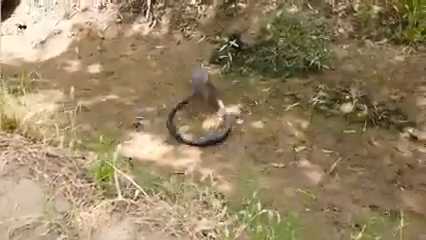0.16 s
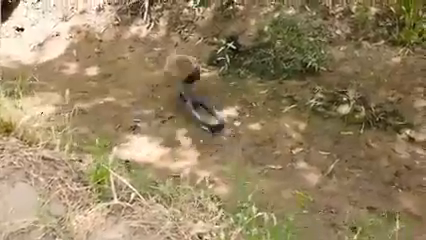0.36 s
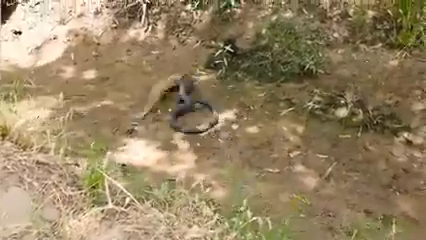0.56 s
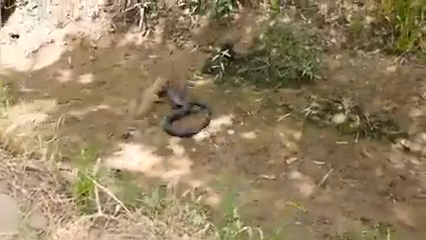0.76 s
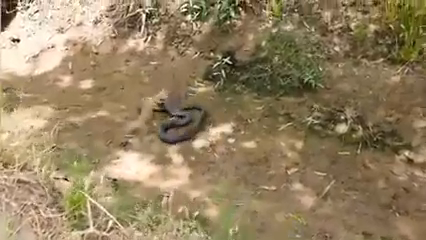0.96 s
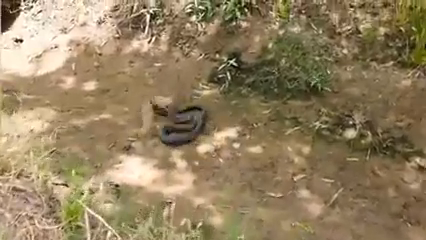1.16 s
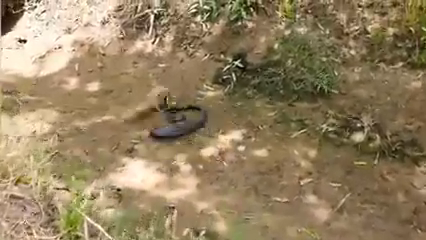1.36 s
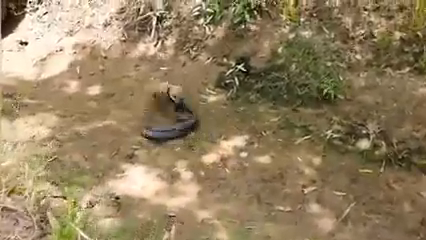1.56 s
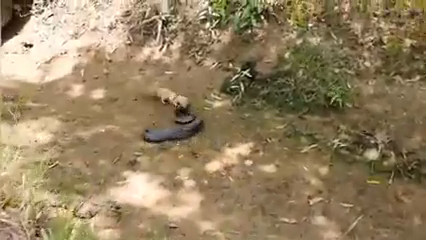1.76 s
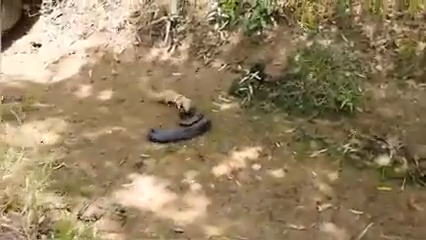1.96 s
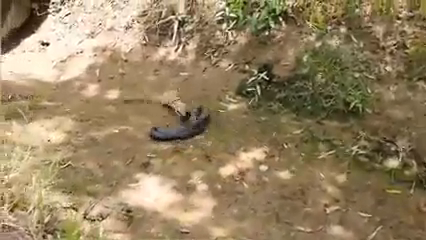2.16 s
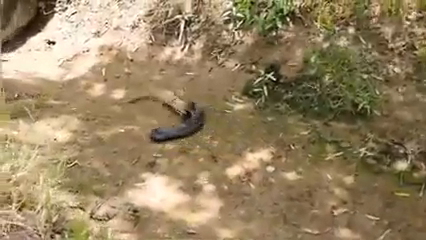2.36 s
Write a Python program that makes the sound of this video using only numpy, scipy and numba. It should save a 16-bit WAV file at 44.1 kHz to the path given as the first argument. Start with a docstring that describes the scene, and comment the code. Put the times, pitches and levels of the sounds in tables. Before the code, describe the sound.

Close outdoors, a snake lets out a sudden rasping hiss, a second that swells, and a third that holds. Faint bumps and ticks on dirt fall in between, while wind rumbles and thumps the microphone near the end.

```python
"""A cornered snake hisses three times at a small animal on dry open ground, close to the microphone.
Rushing air makes its throat ring at a gliding pitch and sizzles at its mouth. The animals bump and
scuffle. A faint, grainy rush swells just before the first hiss, and a short hollow blip follows it.
Wind rumbles on the microphone's two openings (ports) and buffets the right one around the last hiss."""
import sys
import numpy as np
from scipy import signal
from scipy.fft import rfft, irfft
from scipy.io import wavfile
from scipy.ndimage import uniform_filter1d
from numba import njit

SR = 44100
rng = np.random.default_rng(int(sys.argv[2]) if len(sys.argv) > 2 else 0)


def dump_mix(stems):
    """Bounce the given channels to the path in sys.argv[1] as a 16-bit WAV at rate SR."""
    frames = np.atleast_2d(stems).T  # one column per channel
    limited = np.clip(frames, -1, 1)  # hard clip at full scale
    pcm = np.round(limited * 32767).astype(np.int16)
    wavfile.write(sys.argv[1], SR, pcm)


N = 112455
T = np.arange(N) / SR
FREQS = np.maximum(np.fft.rfftfreq(N, 1 / SR), 1)


def undb(db):
    """Turn decibels into a number to multiply by."""
    return 10 ** (np.asarray(db) / 20)


def unit(x):
    """Scale a sound to an average strength (rms) of 1."""
    return x / np.sqrt(np.mean(x ** 2))


def spread(hz, values):
    """Give every frequency a value by joining points with lines on a log scale."""
    return np.interp(np.log(FREQS), np.log(hz), values)


def colour(x, points):
    """Shape a noise's lows and highs with (pitch_hz, relative_db) points, at strength 1."""
    hz, db = np.array(points, float).T
    return unit(irfft(rfft(x) * undb(spread(hz, db)), N))


def below(hz):
    """A steep filter curve that keeps the frequencies under hz."""
    return 1 / (1 + (FREQS / hz) ** 20)


def pan(db):
    """Left and right gains, with the left louder by db and the total power unchanged."""
    gains = undb(np.array([db, -db]) / 2).reshape(2, -1)
    return gains / np.sqrt(np.mean(gains ** 2, axis=0))


def swell(at_s, rise_s, decay_s):
    """A loudness curve that grows to 1 at at_s, then dies away."""
    return np.exp(np.where(T < at_s, (T - at_s) / rise_s, (at_s - T) / decay_s))


def wander(per_s):
    """A random curve of strength 1 that heads for a new value per_s times a second."""
    step = max(int(SR / per_s), 1)
    stairs = np.repeat(rng.standard_normal(N // step + 1), step)
    return unit(uniform_filter1d(stairs, step)[:N])


def steady(pair, size=1300):
    """Hold a noise near strength 1, averaging over size samples."""
    return pair / np.sqrt(uniform_filter1d(np.mean(pair ** 2, axis=0), size) + 1e-18)


@njit
def band_pass(x, hz, width_hz):
    """Keep the sound near a pitch that can move (a state-variable filter)."""
    out, band_state, low_state = np.empty(len(x)), 0., 0.
    for i in range(len(x)):
        tuning, damping = np.tan(np.pi * hz[i] / SR), width_hz / hz[i]
        band = (band_state + tuning * (x[i] - low_state)) / (1 + tuning * (tuning + damping))
        band_state = 2 * band - band_state
        low_state += 2 * tuning * band
        out[i] = damping * band
    return out


def resonate(pair, hz, width_hz):
    """Make both channels ring near a pitch, filtering twice for a cleaner peak."""
    for _ in range(2):
        pair = [band_pass(np.ascontiguousarray(x), hz * np.ones(N), float(width_hz)) for x in pair]
    return np.array(pair)


# How the two ports hear a sound in front of them.
# pitch_hz, left_minus_right_db, extra_left_lead_rad, likeness_0_to_1
PORTS = [(150, -1.5, 1.5, 0.3), (500, 0, 0.18, .97), (1180, 2, 2, 0.89), (2100, 10, 1.4, 0.95),
         (2870, 9.5, -0.5, 0.7), (3570, 1, 1, 0.9), (4270, -3, -0.05, 0.7), (4860, -1, 0.04, 0.96),
         (5570, 1.5, 0.33, 0.56), (6400, 8.5, -.5, .6), (8200, 11, 0, 0.4), (9000, 4.5, 1.5, 0),
         (10000, -4, -1.5, .4), (11400, 3, -2.5, 0.2), (13300, 2, -2.5, 0.6), (15500, -3.5, -2, .4)]


def stereo_noise(right_lead_s=9.07e-5):
    """White noise from ahead reaches the two ports with different strength, timing and detail."""
    hz, balance_db, lead_rad, likeness = np.array(PORTS, float).T
    shared, own = rfft(rng.standard_normal((2, N)))
    alike = spread(hz, likeness)
    right = alike * shared + np.sqrt(1 - alike ** 2) * own
    right *= np.exp(1j * (2 * np.pi * FREQS * right_lead_s - spread(hz, lead_rad)))
    return irfft(np.array([shared, right]) * pan(spread(hz, balance_db)), N)


# The tone of the wind on the ports: pitch_hz, relative_db
RUMBLE_COLOUR = [(12, -39.5), (20, 3), (38, -3.5), (86, 4.5), (110, -10.5), (146, -15), (250, -29.5),
                 (320, -22.5), (550, -120)]


def wind_rumble(level_db=-45.5, likeness=0.91):
    """Wind flowing over the ports makes a steady low rumble, nearly the same in both."""
    shared = np.sqrt(likeness) * rng.standard_normal(N)
    own = np.sqrt(1 - likeness) * rng.standard_normal((2, N))
    return colour(shared + own, RUMBLE_COLOUR) * undb(level_db) * pan(-1.5)


# The tone of the outdoor background: pitch_hz, relative_db
AIR_COLOUR = [(120, -45), (200, -14), (400, -8), (538, -7), (800, -12.5), (1370, -10), (5000, -20.5),
              (16000, -30)]


def open_air(level_db=-61.5):
    """The open air adds a faint, even hush."""
    return undb(level_db) * colour(stereo_noise(), AIR_COLOUR)


# How loud the faint, grainy rush is: time_s, level_db
GRAINY_LEVELS = [(0, -69.5), (.15, -49.5), (.22, -76.5), (0.851, -72), (1.44, -60), (1.62, -56),
                 (2.55, -66.5)]
# Its tone: pitch_hz, relative_db
GRAINY_COLOUR = [(1000, -14), (2500, -3.5), (4000, -3), (6500, 2), (9500, -13), (13000, 0.5), (16000, -7)]


def grainy_rush(grain_db=2):
    """A faint, grainy rush of noise swells just before the first hiss and more softly near the third."""
    time_s, level_db = np.array(GRAINY_LEVELS, float).T
    noise = colour(stereo_noise(), GRAINY_COLOUR)
    return noise * undb(np.interp(T, time_s, level_db) + grain_db * wander(per_s=180))


# A hiss has three bands: throat (low), mouth (middle) and sizzle (high). Each starts here.
THROAT_FROM_HZ, MOUTH_FROM_HZ, SIZZLE_FROM_HZ = 290, 4700, 9500


def ringing(track, width_hz, bottom_hz):
    """Rushing air rings a hollow space, whose pitch and strength glide along a track."""
    time_s, pitch_hz, level_db = np.array(track, float).T
    air = irfft(rfft(stereo_noise()) * (1 - below(bottom_hz)), N)
    ring = resonate(air, np.interp(T, time_s, pitch_hz), width_hz)
    return steady(ring) * undb(np.interp(T, time_s, level_db))


def hiss(levels, tone, throat_ring, mouth_ring, lip_ring):
    """One blast of air: a broad rush with the throat, mouth and lips ringing in it."""
    def loudness(db, boost_db):
        return undb(np.interp(T, time_s, db, left=-120, right=-120) + boost_db)

    time_s, throat_db, mouth_db, sizzle_db = np.array(levels, float).T
    rush = rfft(colour(stereo_noise(), tone)) * (1 - below(THROAT_FROM_HZ))
    throat = steady(irfft(rush * below(MOUTH_FROM_HZ), N)) + throat_ring
    mouth = steady(irfft(rush * (below(SIZZLE_FROM_HZ) - below(MOUTH_FROM_HZ)), N)) + mouth_ring
    sizzle = steady(irfft(rush * (1 - below(SIZZLE_FROM_HZ)), N)) + lip_ring
    flutter = undb(0.51 * wander(per_s=130))
    return flutter * (steady(throat, size=700) * loudness(throat_db, boost_db=0.28)
                      + steady(mouth) * loudness(mouth_db, boost_db=0.8)
                      + steady(sizzle) * loudness(sizzle_db, boost_db=4))


# How loud each band is before its boost, one list per hiss: time_s, throat_db, mouth_db, sizzle_db
HISS_LEVELS = [
    [(0.175, -69.5, -59.5, -71.5), (0.178, -23.5, -27.5, -38), (0.184, -23.5, -15, -25.5),
     (0.204, -21, -19.5, -22.5), (0.228, -20, -22, -30), (0.264, -25.5, -25.5, -28),
     (0.284, -25.5, -27, -33), (0.298, -22.5, -20.5, -23), (0.336, -22.5, -24, -23),
     (0.364, -18, -21.5, -31), (0.384, -27.5, -33.5, -35), (0.4, -22.5, -27.5, -30),
     (0.476, -22.5, -30.5, -45.5), (0.526, -29, -40, -51.5), (0.55, -49, -53.5, -64),
     (0.61, -82.5, -67, -83)],
    [(0.85, -76, -82, -81), (0.864, -45.5, -59, -62), (0.886, -32.5, -42, -47.5),
     (0.914, -29, -38.5, -48.5), (0.978, -29, -33, -38.5), (1.01, -29, -38, -34.5),
     (1.066, -32, -39.5, -34.5), (1.166, -31, -31.5, -32), (1.302, -29, -29.5, -25), (1.34, -17, -28, -26),
     (1.366, -16.5, -27, -28), (1.392, -23, -23.5, -30), (1.402, -23.5, -22, -33.5),
     (1.424, -20.5, -34, -49), (1.432, -46.5, -48.5, -55), (1.52, -77, -69, -76.5)],
    [(1.57, -68.5, -71, -66.5), (1.65, -37.5, -42.5, -45.5), (1.708, -28, -40.5, -53.5),
     (1.738, -16.5, -29, -43.5), (1.748, -29, -32.5, -44), (1.774, -29, -35.5, -51),
     (1.808, -25, -35.5, -41), (1.868, -29, -31, -47), (1.896, -24.5, -34, -44.5),
     (2.134, -22, -29.5, -35.5), (2.17, -22, -31, -31.5), (2.258, -24.5, -27, -33),
     (2.281, -28, -35.5, -37.5), (2.294, -52.5, -56, -54.5), (2.38, -83, -73, -78.5)],
]
# The tone of the rushing air, as relative levels: pitch_hz, first_hiss_db, second_hiss_db, third_hiss_db
HISS_COLOURS = [(250, -48, -20, -28), (444, -15.5, -20, -28), (720, -29, -14, -29.5),
                (960, -29, -27.5, -44.5), (1304, -15, -27, -19.5), (1640, -7, -14.5, -5),
                (1730, -2, -1, -3.5), (2100, -3, 1.5, -1.5), (2840, -1.5, 0, -15), (3100, -4, -7, -20),
                (4400, -0.5, -6.5, -23), (4820, -11, -13.5, -21), (6270, -8, 1, -6.5),
                (7700, -5.5, 0.5, -3.5), (8170, -9, 1.5, -5), (10320, -13.5, -9, -25.5),
                (12200, -15.5, -6.5, -19.5), (12500, -14, -4.5, -17), (15000, -22, -14.5, -32.5)]
# Six gliding rings in the snake's airway, each with: time_s, pitch_hz, level_over_rush_db
THROAT_LOW = [(.18, 2090, -1.5), (.28, 1990, -26), (.345, 1420, -6.5), (.38, 1930, -23), (.42, 2030, 2.5),
              (.455, 2084, 14.5), (.475, 2440, 3), (.53, 2050, 2.5), (.87, 1806, -5), (1.05, 1877, -3.5),
              (1.18, 1840, 1), (1.31, 1830, -4.5), (1.35, 1840, -34), (1.39, 2010, -7.5), (1.42, 2160, 6),
              (1.44, 2200, -17.5), (1.65, 1480, -3), (1.71, 2020, -3.5), (1.735, 2024, 5), (1.77, 1850, -7),
              (1.95, 1617, -2), (2.08, 1764, 3.5), (2.17, 1804, 1.5), (2.24, 1760, 3), (2.29, 1620, -2.5)]
THROAT_HIGH = [(.18, 3540, -6.5), (.22, 4120, 6.5), (.27, 3720, 0.5), (.31, 3540, 6), (.35, 3180, 7.5),
               (.37, 3620, 8.5), (.445, 3480, 6), (.48, 2820, 13.5), (.53, 2640, 4), (.87, 2490, -2.5),
               (1.0, 2770, -8.5), (1.15, 3820, -9), (1.285, 3620, 1), (1.298, 3400, -14), (1.31, 2720, 4.5),
               (1.335, 2780, 13), (1.36, 2860, 18.5), (1.39, 3100, 4.5), (1.42, 2720, 9),
               (1.44, 2700, -8.5), (1.7, 2630, -2), (1.85, 2740, -7.5), (1.92, 2500, 2.5), (2.05, 2480, 3),
               (2.15, 2480, -1.5), (2.18, 2600, -14.5), (2.2, 3800, -10.5), (2.29, 3850, -5.5)]
WINDPIPE_LOW = [(.2, 512, -24.5), (.4, 520, -28.5), (.46, 410, -20), (.53, 427, -24), (.9, 443, -25),
                (1.15, 384, -23), (1.29, 435, -16), (1.37, 450, -15.5), (1.42, 434, -25), (1.75, 470, -30),
                (2.28, 380, -31.5)]
WINDPIPE_HIGH = [(.44, 910, -36), (.48, 810, -14.5), (0.529, 700, -13.5), (.9, 784, -20.5),
                 (1.28, 730, -30), (1.32, 1040, -29), (1.36, 1120, -10.5), (1.39, 895, -25.5),
                 (1.42, 830, -21), (1.7, 660, -40)]
MOUTH = [(.18, 5950, 3), (.205, 5960, -5), (.23, 7600, -1), (.32, 7950, -6.5), (.38, 7000, -19),
         (.45, 6870, 2), (.53, 6560, 5.5), (.9, 7520, -4.5), (1.25, 7800, 5), (1.345, 8460, -2.5),
         (1.385, 6640, 12.5), (1.405, 6480, 21.5), (1.425, 6140, 20.5), (1.44, 6160, 3), (1.7, 5300, 7),
         (1.79, 5880, 9.5), (1.83, 5550, 12), (1.86, 7300, -20), (2.29, 7380, 4)]
LIPS = [(.2, 12100, -3), (.32, 13300, 3), (.45, 12100, -1), (.92, 11900, 1), (1.12, 12300, -1),
        (1.24, 14200, 5), (1.35, 14100, 1.5), (1.41, 12300, 8.5), (1.75, 12000, -17), (1.95, 11450, 6),
        (2.27, 12470, 1)]


def snake():
    """The snake forces three breaths through the same airway, each with its own tone."""
    throat = (ringing(THROAT_LOW, width_hz=230, bottom_hz=1270)
              + ringing(THROAT_HIGH, width_hz=600, bottom_hz=1270)
              + ringing(WINDPIPE_LOW, width_hz=130, bottom_hz=THROAT_FROM_HZ)
              + ringing(WINDPIPE_HIGH, width_hz=130, bottom_hz=THROAT_FROM_HZ))
    mouth = ringing(MOUTH, width_hz=1500, bottom_hz=MOUTH_FROM_HZ)
    lips = ringing(LIPS, width_hz=3800, bottom_hz=SIZZLE_FROM_HZ)
    tones = np.array(HISS_COLOURS, float)
    return sum(hiss(levels, tones[:, [0, k + 1]], throat, mouth, lips)
               for k, levels in enumerate(HISS_LEVELS))


# Soft bumps, ticks and scuffs on the ground: peak_s, pitch_hz, width_hz, level_db, rise_s, decay_s
BUMPS = [(.198, 486, 161, -37, 0.0022, 0.031), (0.391, 477, 350, -36.5, 0.0018, 0.0074),
         (0.392, 1150, 500, -34, 0.0018, 0.003), (0.55, 170, 300, -35.5, 0.0025, 0.0057),
         (0.57, 517, 500, -40.5, 0.001, 0.0035), (0.738, 2180, 800, -31.5, 0.0007, 0.0015),
         (0.737, 4790, 9000, -37, 0.0004, 0.00041), (0.766, 880, 1490, -51, .0006, 0.0082),
         (1.628, 1090, 2560, -35, 0.00035, 0.016), (1.66, 560, 1000, -38, 0.018, 0.016),
         (2.449, 1760, 2220, -55, 0.0097, 0.067)]


def scuffle():
    """Bodies and paws hit dry earth, making bursts of noise that die quickly."""
    out = 0
    for peak_s, pitch_hz, width_hz, level_db, rise_s, decay_s in BUMPS:
        burst = steady(resonate(stereo_noise(), pitch_hz, width_hz), size=500)
        out += burst * undb(level_db) * swell(peak_s, rise_s, decay_s)
    return out


def blip(peak_s=0.6303, pitch_hz=459, level_db=-28.5):
    """A hollow note only a few vibrations long."""
    note = np.sin(2 * np.pi * pitch_hz * (T - peak_s))
    return note * undb(level_db) * swell(peak_s, rise_s=0.0062, decay_s=0.0038)


# Puffs of wind on the ports: peak_s, left_db, right_db, rise_s, decay_s, pitch_ratio
GUSTS = [(1.69, -53, -24, 0.028, 0.089, .8), (1.854, -42, -28, 0.0084, 0.0098, 2),
         (1.873, -44, -14, 0.012, 0.0057, 1), (1.961, -45, -23.5, 0.048, 0.019, .9),
         (2.029, -32, -20, 0.018, 0.022, 1), (2.081, -27.5, -21.5, 0.033, 0.047, .95),
         (2.118, -26, -27, 0.01, 0.02, 1.6), (2.384, -34, -22, 0.005, 0.011, 1.25),
         (2.41, -35, -24.5, .015, 0.042, 1)]
# The tone of a gust whose pitch_ratio is 1: pitch_hz, relative_db
GUST_COLOUR = [(15, -30), (35, 2), (65, 6), (110, -6.5), (170, -18), (260, -34.5), (500, -74), (2000, -90)]


def gusts():
    """Gusts hit each port separately, so each side gets its own low thumping noise."""
    out = 0
    for peak_s, left_db, right_db, rise_s, decay_s, pitch_ratio in GUSTS:
        tone = [(hz * pitch_ratio, db) for hz, db in GUST_COLOUR]
        sides = [colour(rng.standard_normal((1, N)), tone) for _ in range(2)]
        buffet = np.vstack([steady(side, size=1500) for side in sides])
        out += buffet * undb([[left_db], [right_db]]) * swell(peak_s, rise_s, decay_s)
    return out


def outdoor_echoes(pair, near_db=-11, near_decay_s=0.011, far_db=-33.5, far_fade_s=0.38):
    """Sound bounces off the nearby ground, then returns faint and dull from banks and bushes."""
    shared, difference = rng.standard_normal((2, N))
    # The two ports hear different ground echoes mainly above 3600 Hz.
    difference = irfft(rfft(difference) * FREQS / np.hypot(FREQS, 3600), N)
    near = np.array([shared + difference, shared - difference]) * np.exp(-T / near_decay_s) * (T > .001)
    dull = signal.butter(1, 7000, fs=SR, output="sos")
    far = signal.sosfilt(dull, rng.standard_normal((2, N))) * undb(-60 * T / far_fade_s)
    echoes = (undb(near_db) * unit(near) + undb(far_db) * unit(far)) / np.sqrt(N)
    return pair + signal.fftconvolve(pair, echoes, axes=1)[:, :N]


def scene():
    """The fight on open ground, in light wind."""
    fight = outdoor_echoes(snake() + scuffle() + blip())
    return fight + wind_rumble() + gusts() + open_air() + grainy_rush()


def record(dry):
    """The recorder flattens any peak beyond its limit and cuts the highest treble."""
    limit, top_hz = 0.85, 16000
    treble_cut = signal.ellip(10, .1, 80, top_hz, fs=SR, output="sos")
    return signal.sosfilt(treble_cut, np.clip(dry, -limit, limit))


dry = scene()
out = record(dry)
dump_mix(out)
```